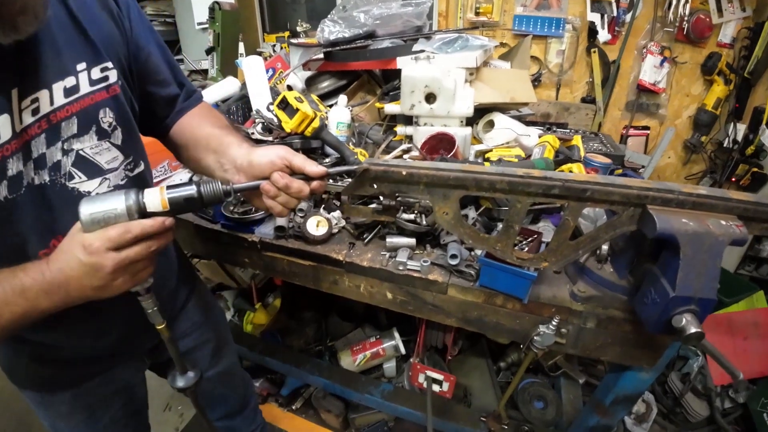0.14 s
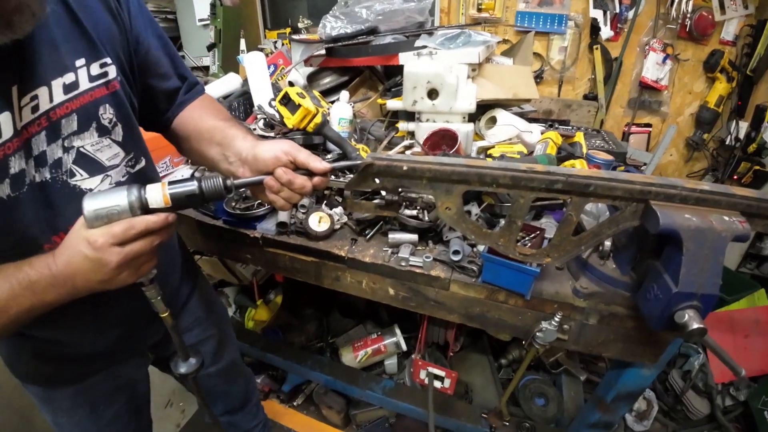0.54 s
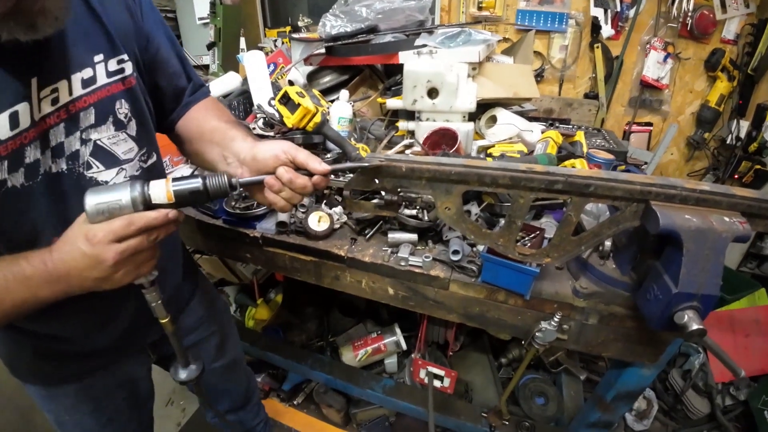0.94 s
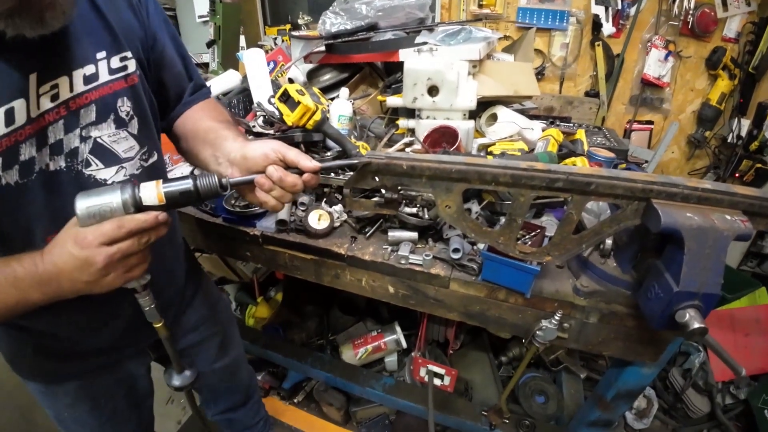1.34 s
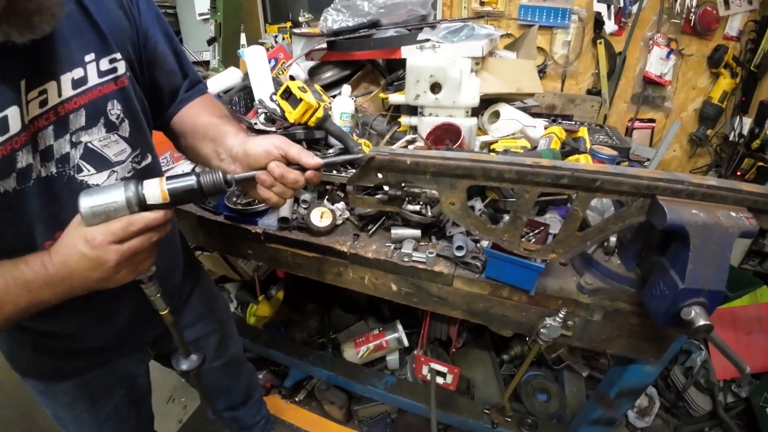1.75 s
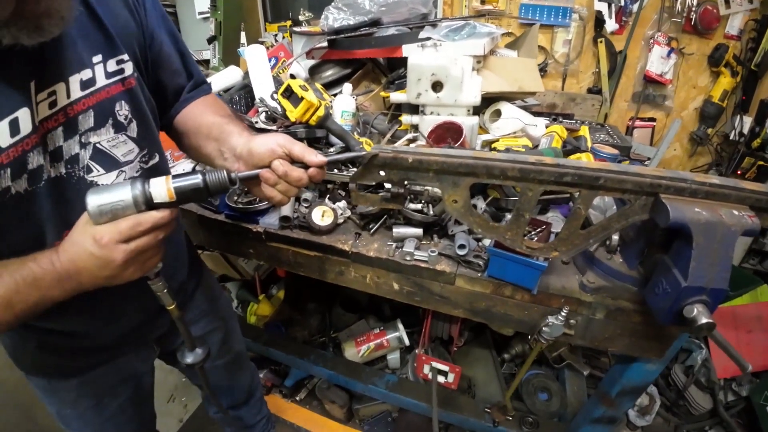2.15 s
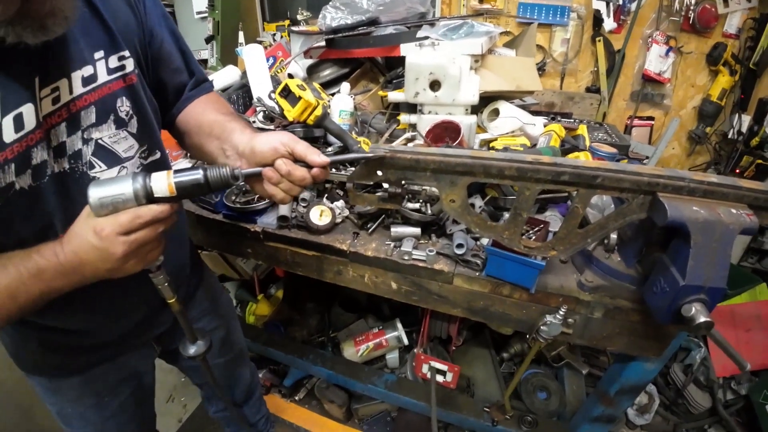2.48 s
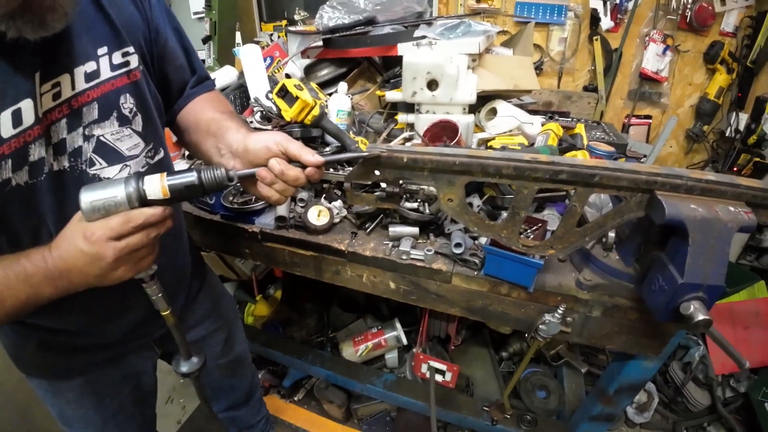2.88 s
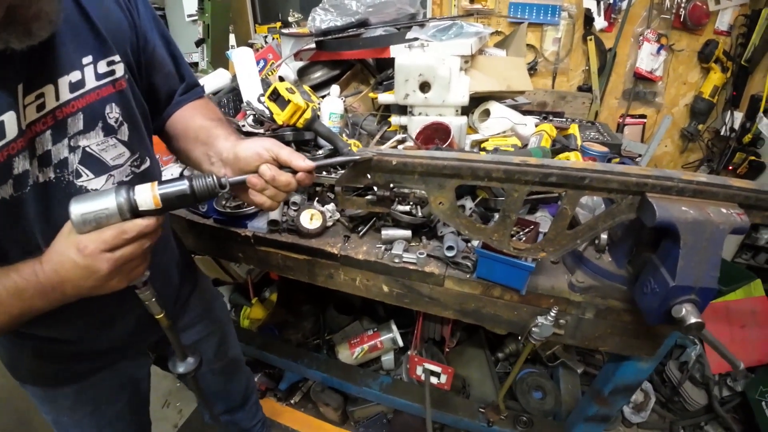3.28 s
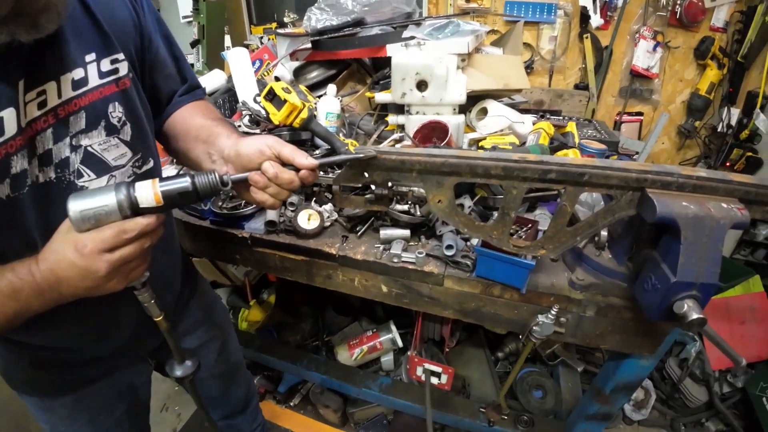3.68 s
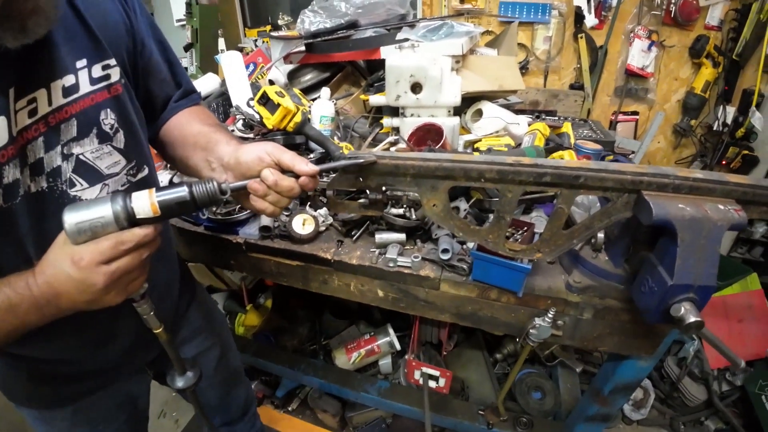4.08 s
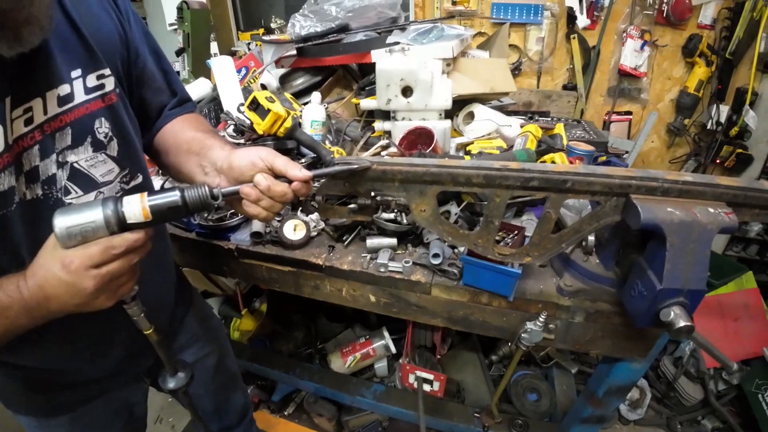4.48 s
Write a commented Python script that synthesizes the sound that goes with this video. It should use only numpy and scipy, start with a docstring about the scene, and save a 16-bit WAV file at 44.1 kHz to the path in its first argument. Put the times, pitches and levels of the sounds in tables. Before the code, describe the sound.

Close, loud air-hammer bursts crack and ring on steel with puffing exhaust, broken by quiet gaps, then run on steadily to the end.

```python
"""A cluttered workshop, close by an air chisel that hammers in five bursts at plastic on a steel frame in a vice.
Each piston stroke cracks on the steel (coloured noise), rings the bit and the frame (sets of dying modes)
and lets out two puffs of air (pressure pulses, the first with a hiss).
Between bursts the bit taps and scrapes; a hiss of air leads into a burst, over quiet shop air with a low hum.
Two close microphone ports hear it; a fast limiter holds the blows down and lets the room swell after them."""
import sys
import numpy as np
from scipy import signal
from scipy.fft import rfft, irfft
from scipy.io import wavfile
from scipy.ndimage import uniform_filter1d

SR = 44100
rng = np.random.default_rng(int(sys.argv[2]) if len(sys.argv) > 2 else 0)


def transcribe(u):
    """Save the signal u as a 16-bit wav file named by the first command-line argument.

    u: samples, shape (n,) or (channels, n), limited to [-1, 1]; the rate is SR.
    q: integer samples, one column per channel.
    """
    v = np.clip(np.atleast_2d(u).T, -1, 1)
    q = np.round(v * 32767).astype(np.int16)
    wavfile.write(sys.argv[1], SR, q)


N = 203918
TIME = np.arange(N) / SR

# Pulls of the trigger. Each row: first blow in seconds, end in seconds, opening pace in blows per second,
# time scale in seconds of settling to full swing, force in dB, extra on the first stroke in dB,
# frame contact in dB, freedom of the bit to ring in dB, valve leak in dB.
BURSTS = [(-.055, .042, 73.7, 0.029, 4, -6, 2, -1, -52), (0.2691, .962, 77.5, 0.022, 0, -11, 1, 1.5, -56),
          (1.5869, 2.617, 85.7, 0.033, -3, -16, 1, 1.5, -51.5),
          (2.9349, 3.08, 61.6, .0335, 1, -16.5, 4, -1, -55),
          (3.2417, 5.0, 63.9, 0.041, -3, -16, 2, 0.5, -58)]
# Spectra of the crack on steel and of the escaping air. Each row: frequency in Hz, relative density in dB.
CRACK_SPECTRUM = [(60, -5.5), (250, 0.5), (550, 1.5), (850, -2.5), (1250, -3), (2000, -7.5), (3300, -7.5),
                  (4400, -12.5), (5400, -9), (9000, -15), (10400, -15), (12000, -44.5), (13600, -51),
                  (15300, -22)]
AIR_SPECTRUM = [(30, 12), (150, 6.5), (400, -3), (1000, -4.5), (2500, -7.5), (4400, -11.5), (5800, -6.5),
                (9000, -14), (10400, 1.5), (12000, -27.5), (13600, -35), (15300, -19.5)]
# Modes of the bit (two low bending modes first) and of the steel frame.
# Each row: frequency in Hz, relative level in dB, time to fall 60 dB in seconds.
BIT_MODES = [(2859, -16, .025), (5179, -17, .02), (9950, -5, .008), (10270, -8, .08), (10350, -7, .06),
             (10405, -7, .08), (10505, -7, .06), (10600, -4, .09), (10720, -5, .04), (10520, 1, .008),
             (11450, -25, .05), (15470, -32, .02)]
FRAME_MODES = [(140, -13, 0.048), (248, -17.5, 0.037), (360, -3, 0.23), (448.5, 8.5, 0.046),
               (542.6, 3, 0.11), (667.6, 3, 0.082), (1098, 2, .05), (1300, -6.5, 0.048), (2300, -4, 0.021)]


def amp(db):
    """Turns dB into an amplitude factor."""
    return 10 ** (np.asarray(db) / 20)


def unit(x):
    """Scales to an energy of one."""
    return x / np.sqrt(np.sum(x ** 2) + 1e-20)


def read(points, hz):
    """Joins points by straight lines on a log-frequency axis."""
    f, value = np.transpose(points)
    return np.interp(np.log(hz + 1), np.log(f), value)


def through(x, response):
    """Passes a sound through an impulse response."""
    return signal.oaconvolve(x, response)[:N]


def colour(x, spectrum, size=4096):
    """Causal (minimum-phase) filter with the given spectrum that keeps the power of white noise."""
    hz = abs(np.fft.fftfreq(size, 1 / SR))
    log_gain = np.log(amp(read(spectrum, hz)))
    response = np.fft.ifft(np.exp(np.conj(signal.hilbert(log_gain)))).real
    return through(x, unit(response[:size // 2]))


def kicks(times, db, steady_hz=49, fade_s=0.006):
    """One impulse a blow, sized for the given rms at the steady pace; one before time zero is already fading."""
    train = np.zeros(N)
    size = amp(db) * np.sqrt(SR / steady_hz) * np.exp(np.minimum(times, 0) / fade_s)
    train[np.clip(np.round(times * SR).astype(int), 0, N - 1)] = size
    return train


def puff(rise_s, fall_s):
    """A quick rise and an exponential fall, of unit energy."""
    t = np.arange(SR // 10) / SR
    return unit((1 - np.exp(-t / rise_s)) ** 2 * np.exp(-t / fall_s))


def chatter(train, rise_s, fall_s, grain_db=0):
    """Each impulse becomes a short rush of uneven micro-impacts."""
    grains = amp(grain_db * rng.standard_normal(N // 16 + 1)).repeat(16)[:N]
    grains /= np.sqrt(np.mean(grains ** 2))
    return through(train, puff(rise_s, fall_s)) * rng.standard_normal(N) * grains


def ringing(modes):
    """Impulse response of a set of dying modes, of unit energy."""
    t = np.arange(SR // 2) / SR
    response = np.zeros(len(t))
    for hz, db, t60 in modes:
        response += amp(db) * unit(np.sin(2 * np.pi * hz * t) * 1e3 ** (-t / t60))
    return unit(response)


def wander(times, step_s):
    """Slow chance: a new value every step, joined by straight lines."""
    return np.interp(times / step_s, np.arange(256), rng.standard_normal(size=256))


def blow_times(burst, jitter_s=0.0002):
    """The piston starts with short quick strokes, then settles to its pace; it strikes once a cycle, unevenly."""
    # Pace at full swing, wandering with the load. Each row: time in seconds, blows per second.
    full_swing = [(0.4, 49.28), (0.5, 45.6), (0.62, 44.58), (0.72, 47.4), (0.9, 50.68), (0.95, 44.04),
                  (1.72, 48.85), (1.84, 45.82), (1.96, 49.22), (2.25, 49.79), (2.6, 49.5), (3.5, 48.67),
                  (3.85, 49.44), (4.6, 49.04)]
    start, end, opening_hz, settle_s = burst[:4]
    t = np.arange(start, end, 1 / SR)
    pace = np.interp(t, *np.transpose(full_swing))
    rate = pace + (opening_hz - pace) * np.exp(-((t - start) / settle_s) ** 4)
    cycles = np.cumsum(rate) / SR
    slip = jitter_s * rng.standard_normal(size=128)
    times = np.interp(np.arange(cycles[-1]), cycles, t)
    return times + slip[:len(times)]


def strokes():
    """Every blow of every burst: its time, its number in the burst, the time left, and the levels of its burst."""
    rows = []
    for burst in BURSTS:
        for number, s in enumerate(blow_times(burst)):
            if s < TIME[-1]:
                rows.append((s, number, burst[1] - s, *burst[4:8]))
    return np.array(rows).T


def room(x, count=3):
    """Diffuse tails that die by band; they take turns as the man and the tool shift."""
    # Decay of the workshop. Each row: frequency in Hz, time to fall 60 dB in seconds.
    decay = [(100, .4), (500, 0.23), (2000, 0.24), (6000, 0.25), (10500, 0.21), (15000, 0.083)]
    wet = np.zeros(N)
    for k in range(count):
        hz, t, z = signal.stft(rng.standard_normal(SR * 3 // 4), SR, nperseg=256)
        fade = 1e3 ** (-t / read(decay, hz)[:, None])
        build_up = 1 - np.exp(-t / 0.008)
        tail = signal.istft(z * fade * build_up, SR, nperseg=256)[1]
        share = np.cos(np.pi * (2.693 * TIME + k / count)) * np.sqrt(2 / count)
        wet += through(x * share, unit(tail))
    return wet


def exhaust_push(ports, open_s=0.00408, drain_s=0.0057, drain_db=-11, low_cut_hz=3.3):
    """Air pressure steps while a port stands open, then drains; the microphone's low cut makes it sag and swing."""
    t = np.arange(SR // 25) / SR
    step = np.exp(-(2 * t / open_s - 1) ** 4)
    pulse = unit(step + amp(drain_db) * np.exp(-t / drain_s))
    first_cut = signal.butter(1, 24, "high", fs=SR, output="sos")
    second_cut = signal.butter(2, low_cut_hz, "high", fs=SR, output="sos")
    push = signal.sosfilt(first_cut, through(ports, pulse))
    return -signal.sosfilt(second_cut, push)


def hammer(back_s=0.0073, lead_s=0.00179, bite_s=0.00098, uneven_db=-0.3, start_db=-8):
    """The piston hits the bit, the bit bites the steel, the piston knocks back; air leaves twice a cycle."""
    # Jolt of the frame in the vice.
    # Each row: frequency in Hz, relative level in dB, time to fall 60 dB in seconds.
    vice_modes = [(225, 0.5, .04), (300, -3, .03)]
    times, number, left_s, force_db, first_db, contact_db, free_db = strokes()

    # the first two strokes of a burst are short and dry: little air, ring or rebound
    short_db = start_db * (number < 2)
    # the third stroke seats the bit with a thump that fades over a few strokes
    seating = (number >= 2) * np.exp(-abs(number - 2) / 2.2)
    # towards the end the tool is eased off the work: the bit rings more freely, the frame less
    easing = np.exp(-left_s / 0.082)
    blow_db = force_db + first_db * np.maximum(1 - number / 2, 0)  # full force by the third stroke

    # base levels of a steady blow, ahead of the mix below
    crack_db = -26.5 + blow_db + 5.5 * seating
    push_db = -26 + blow_db
    frame_db = -29.5 + blow_db + contact_db + 0.5 * short_db + 7 * seating
    # the edge bears on the frame more or less firmly
    frame_db += -5 * easing + 1.5 * wander(times, step_s=0.1)
    ring_db = -34 + force_db + free_db + 3.5 * easing

    luck = rng.standard_normal((256, 7))[:len(times)].T
    blow_luck, return_slip, return_luck, push_luck, bite_slip, bite_luck, frame_luck = luck
    blows = kicks(times - lead_s, crack_db + uneven_db * blow_luck)
    bites = kicks(times + bite_s + 0.00049 * bite_slip, crack_db + 1.4 * bite_luck)
    returns = kicks(times + back_s + 0.00065 * return_slip, crack_db + short_db + 0.9 * return_luck)
    crack = amp(-2) * chatter(blows, 0.00019, 0.0064, grain_db=-0.5)
    crack += amp(-5) * chatter(bites, 0.00019, 0.0021, grain_db=3.5)
    crack += amp(-10) * chatter(returns, 0.00065, 0.0028, grain_db=7.5)

    air_kicks = kicks(times - lead_s, crack_db + short_db)
    air = amp(-2.5) * chatter(air_kicks, 0.011, 0.0069, grain_db=-1.8)

    shocks = kicks(times - lead_s, frame_db + 1.9 * frame_luck)
    rough_shocks = shocks + 0.49 * chatter(shocks, 0.00026, 0.0022)
    frame = amp(-6) * through(rough_shocks, ringing(FRAME_MODES))

    bit_rush = chatter(kicks(times, ring_db + short_db), 0.00052, 0.0095)
    bit = amp(-3) * through(bit_rush, ringing(BIT_MODES))
    bit += amp(-10.5) * room(bit)  # the bit sheds its ring in all directions

    # the frame jolts in the vice as the bit seats
    thud_db = -29 + force_db + 20 * np.log10(seating + 1e-6)
    thud = through(kicks(times, thud_db), ringing(vice_modes))

    ports = kicks(times - 0.0002, push_db + 0.066 * short_db + 0.85 * push_luck)
    ports += amp(-8.5) * kicks(times + back_s + 0.00084 * return_slip, push_db + short_db)
    steel = colour(crack, CRACK_SPECTRUM) + colour(air, AIR_SPECTRUM) + frame + bit + thud
    return steel, amp(4) * exhaust_push(ports)


def shop():
    """Quiet workshop air as coloured noise, with a low hum of steady tones."""
    # Spectrum of the air. Each row: frequency in Hz, relative density in dB.
    air_spectrum = [(25, -9), (60, -13.5), (120, 1.5), (205, 1), (290, -14.5), (500, -7.5), (700, -19),
                    (1000, -20), (3000, -31), (15000, -41)]
    # Tones of the hum. Each row: frequency in Hz, rms level in dB.
    hum_tones = [(100, -87), (150, -86), (199, -80)]
    hum = np.zeros(N)
    for hz, db in hum_tones:
        hum += amp(db) * np.sqrt(2) * np.sin(2 * np.pi * (hz * TIME + rng.random()))
    return amp(-78) * colour(rng.standard_normal(N), air_spectrum) + hum


def taps():
    """Single light knocks of the piston on the loose bit ring the same steel."""
    # Knocks after the trigger is let go. Each row: time in seconds, knock in dB, ring of the bit in dB.
    loose_knocks = [(0.069, -30.5, -31), (1.034, -51.5, -44), (2.647, -43.5, -39), (3.110, -37.5, -37)]
    s, knock_db, ring_db = np.transpose(loose_knocks)
    knock = colour(chatter(kicks(s, knock_db), 0.0007, 0.0041, grain_db=5), CRACK_SPECTRUM)
    bit = through(chatter(kicks(s, ring_db), 0.00025, 0.0036), ringing(BIT_MODES))
    # a loose bit also rings in its two low bending modes
    bend = through(kicks(s, ring_db - 9), ringing(BIT_MODES[:2]))
    # little of a loose knock reaches the frame
    frame_rush = chatter(kicks(s, knock_db - 18), 0.00019, 0.0013)
    return knock + bit + bend + through(frame_rush, ringing(FRAME_MODES))


def leaks(swell_s=0.025, close_s=0.005):
    """The valve leaks a swelling hiss ahead of the first blow, then the piston takes the air."""
    flow = np.zeros(N)
    for start, *_, leak_db in BURSTS:
        flow += amp(leak_db) * np.interp(TIME, [start - swell_s, start, start + close_s], [0, 1, 0])
    return colour(flow * rng.standard_normal(N), AIR_SPECTRUM)


def scrape(attack_s=0.03, release_s=0.034, catch_s=1.287, catch_db=-67):
    """Fine grit under the bit as it is pushed ever harder to a new place; the hollow frame sounds along."""
    # Slides of the bit over the frame. Each row: start in seconds, length in seconds, grit in dB,
    # hollow ring in dB, growth of the pressure in dB.
    slides = [(1.078, 0.217, -73, -80, 13), (2.688, 0.215, -76, -73, 0.5)]
    # Spectrum of the grit. Each row: frequency in Hz, relative density in dB.
    grit_spectrum = [(100, 0), (420, -4), (800, -6), (1200, 2), (2200, 7), (3300, -4), (4200, -7),
                     (5400, -6), (8500, -11.5), (10400, -15.5), (12500, -34)]
    # Hollow modes of the frame.
    # Each row: frequency in Hz, relative level in dB, time to fall 60 dB in seconds.
    hollow_modes = [(424, 0.5, 0.039), (1160, -11, 0.17), (1630, -0.5, 0.032), (1780, -16, 0.016),
                    (2170, -18, .011), (3000, -15, .008)]
    grit, hollow = np.zeros((2, N))
    for start, length, grit_db, hollow_db, growth_db in slides:
        end = start + length
        moving = np.interp(TIME, [start, start + attack_s, end, end + release_s], [0, 1, 1, 0])
        pressure = moving * amp(growth_db * np.clip((TIME - end) / length, -1, 0))
        grit += amp(grit_db) * pressure
        hollow += amp(hollow_db) * pressure
    slips = amp(1.4 * rng.standard_normal(N // 128 + 1)).repeat(128)[:N]
    rub = slips * rng.standard_normal((2, N))
    sliding = colour(grit * rub[0], grit_spectrum) + through(hollow * rub[1], ringing(hollow_modes))
    # the sliding edge catches once on the frame
    catch = colour(chatter(kicks(np.array([catch_s]), catch_db), 0.00058, 0.0048), grit_spectrum)
    return sliding + amp(-12) * catch + amp(1) * through(catch, ringing(FRAME_MODES))


def shade(x, spectrum):
    """Scales each frequency by its dB, without delay."""
    return irfft(rfft(x) * amp(read(spectrum, np.fft.rfftfreq(N, 1 / SR))), N)


def scene():
    """Tool, room and workshop air, heard by two ports so close that they differ only slightly."""
    # Difference between the two microphone ports against their sum, ahead of a common cut of 4 dB.
    # Each row: frequency in Hz, level in dB.
    port_difference = [(60, -24.5), (200, -31), (500, -60), (5500, -56), (6300, -17), (7400, -10.5),
                       (8100, -50), (15000, -41)]
    steel, push = hammer()
    near = steel + taps() + scrape() + leaks()
    reflected = amp(-25) * room(near + amp(-23) * push)
    mid = near + push + reflected + shop()
    side = amp(-4) * shade(mid, port_difference)
    return np.array([mid + side, mid - side])


def record(dry, limit_db=-36.5, recover_db_per_s=140, slope=0.89, edge_hz=15900):
    """A limiter takes off most of what exceeds its limit and recovers steadily; then the treble is cut off."""
    power_db = 10 * np.log10(abs(uniform_filter1d((dry ** 2).mean(0), size=260)) + 1e-14)
    fall = TIME * recover_db_per_s
    held_peak_db = np.maximum.accumulate(power_db + fall) - fall
    over_db = np.maximum(held_peak_db - limit_db, 0)
    held = dry / amp(slope * uniform_filter1d(over_db, size=130))
    band_limit = signal.firwin(511, edge_hz, window=("kaiser", 9), fs=SR)
    return signal.oaconvolve(held, band_limit[None], "same")


dry = scene()
out = record(dry)
transcribe(out)
```